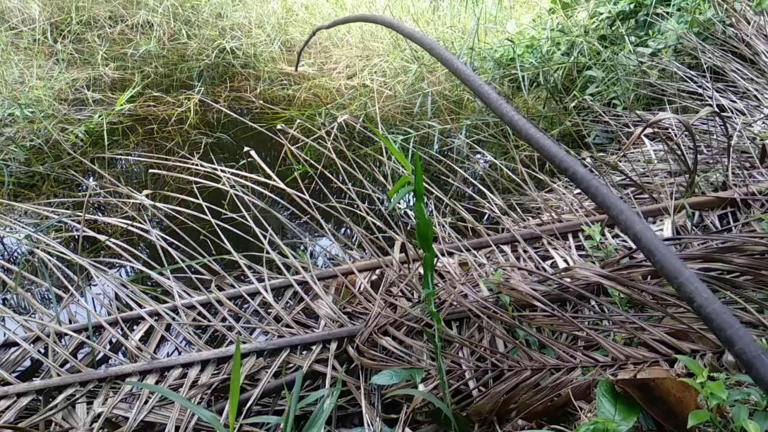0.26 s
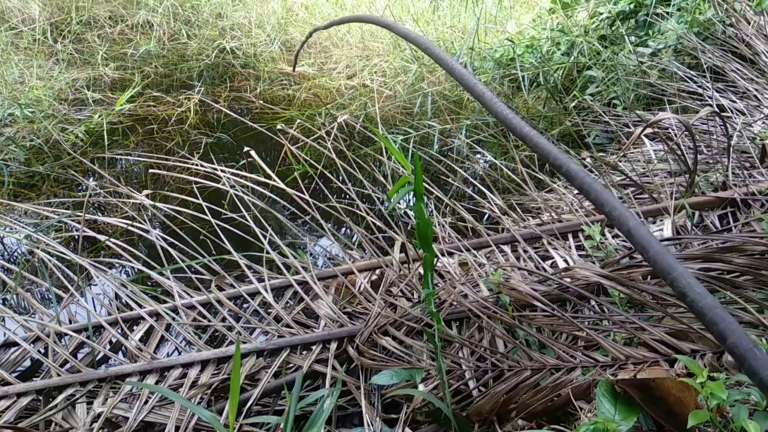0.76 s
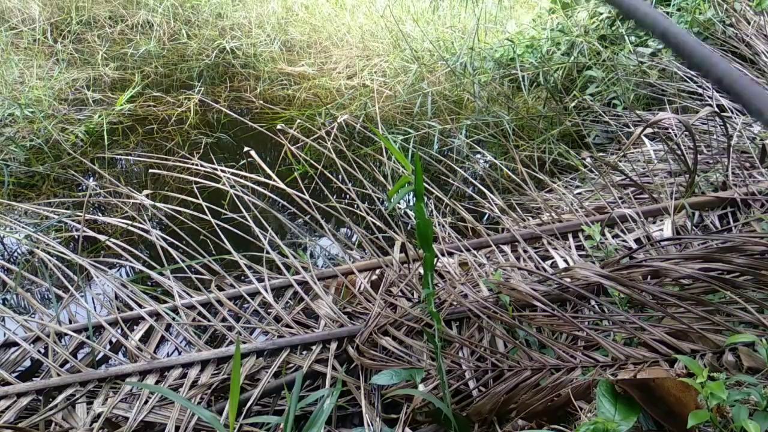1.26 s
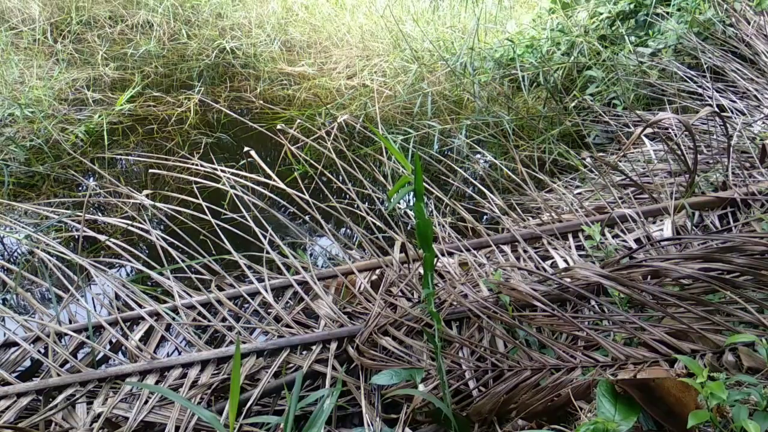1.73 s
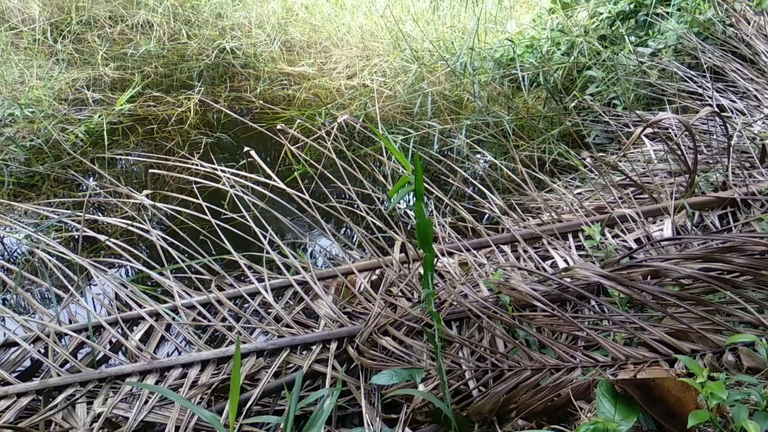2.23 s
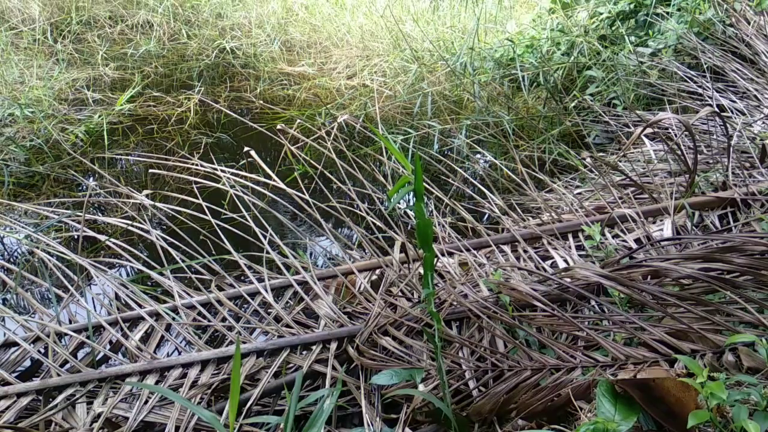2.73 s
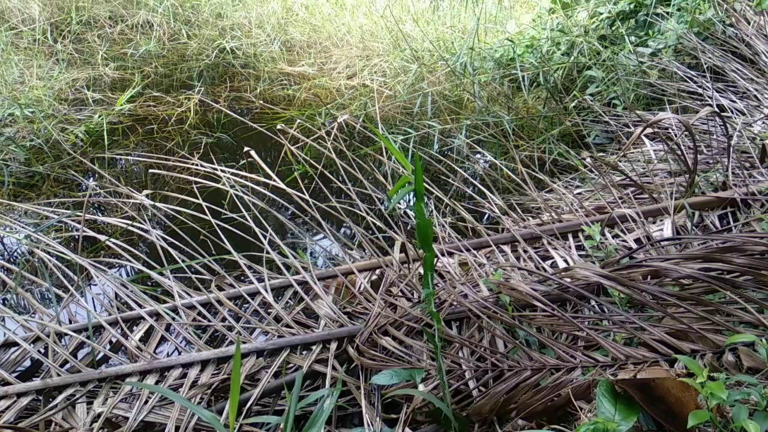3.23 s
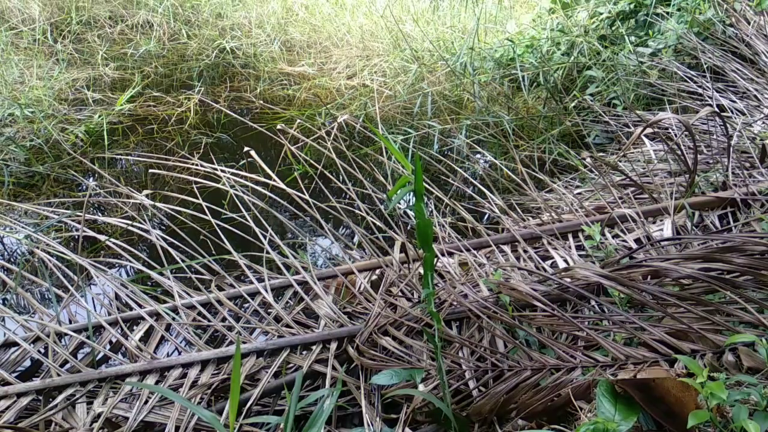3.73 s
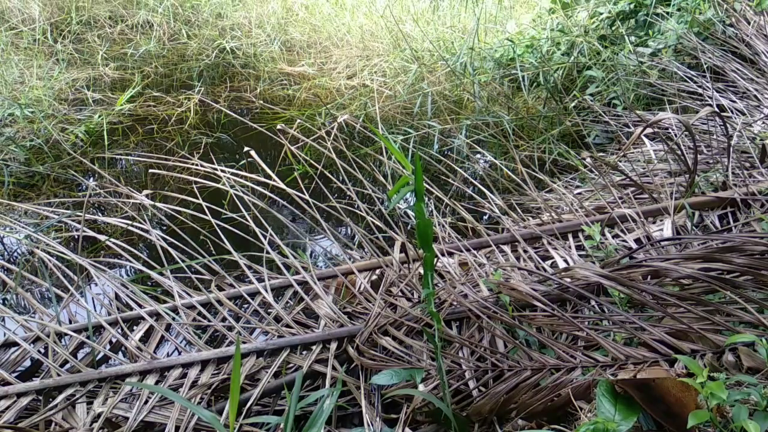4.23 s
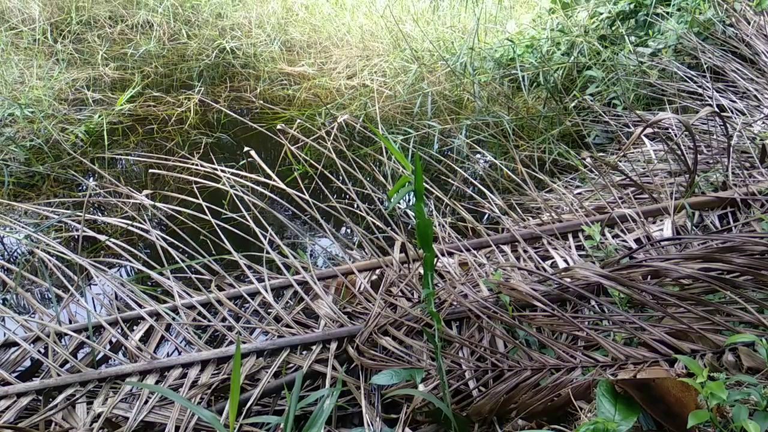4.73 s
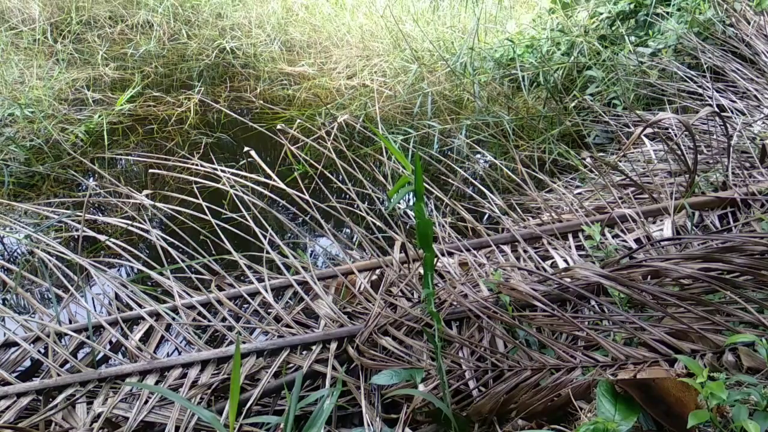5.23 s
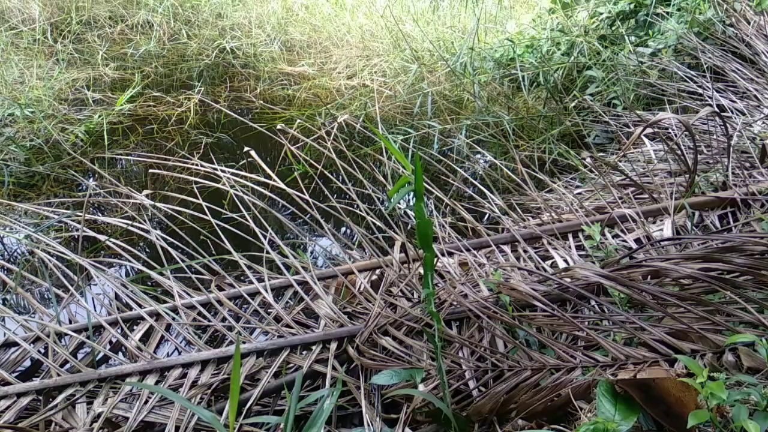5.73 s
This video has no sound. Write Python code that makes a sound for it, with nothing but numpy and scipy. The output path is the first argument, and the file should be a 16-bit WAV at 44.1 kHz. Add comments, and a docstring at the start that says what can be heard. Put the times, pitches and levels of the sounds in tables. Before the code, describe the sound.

Beside a reedy pond, a close cricket trills very high in rapid bouts with tiny gaps, over other steady crickets, rasping katydids and a shrill insect chorus. A small engine with tyre rush passes behind at first, drops slightly in pitch and fades after about three seconds, leaving a faint deep hum. Sparse bird chips come from the bushes. Stereo outdoor pickup.

```python
"""Crickets by a swampy pond

A close cricket pulses, a neighbour keeps time with it, a rival runs faster and katydids rasp over a chorus.
Insect wings are pure or noisy tones, shaped stroke by stroke or click by click; a noise band is the chorus.
A small engine (gliding tones) and its road noise (coloured noise) pass and fade, over faint bird chips,
whistles and dry fronds. Two microphone ports hear it, with reeds and foliage blurring some of the sounds."""
import sys
import numpy as np
from scipy import signal
from scipy.fft import rfft, irfft, next_fast_len
from scipy.io import wavfile
from scipy.ndimage import uniform_filter1d

SR = 44100
rng = np.random.default_rng(int(sys.argv[2]) if len(sys.argv) > 2 else 0)


def output_pcm(signal):
    """Save a mono or channel-first signal as 16-bit PCM at the path in sys.argv[1].

    Samples are clipped to [-1, 1] before scaling.
    """
    pcm = np.clip(np.atleast_2d(signal).T, -1, 1) * 32767
    wavfile.write(sys.argv[1], SR, np.round(pcm).astype(np.int16))


N = 263277
TIME = np.arange(N) / SR  # s
HZ = np.fft.rfftfreq(N, 1 / SR)

# the near cricket and its neighbour share this rate; the start is a share of a cycle
STROKES_PER_S, FIRST_STROKE = 16.597, .182
# one wing stroke, whose pitch sags as the wing slows: cycle_share (0-1), pitch_hz, relative level_db
NEAR_STROKE = [(0, 8130, -30), (.2, 8090, -20), (.27, 8130, -2.5), (.37, 8192, 2.4), (.45, 8203, 3.7),
               (.53, 8190, 3.3), (.6, 8150, .8), (.66, 8000, -3.5), (.7, 7900, -11), (.85, 7795, -13),
               (1, 7770, -18)]
# the near cricket sings in bouts: start_s, end_s, level_db before the stroke shape
BOUTS = [(0.0, 1.277, -34.5), (1.592, 2.535, -34.5), (2.74, 4.196, -34.5), (4.478, 6.1, -33.5)]
BOUT_EDGE_S, FALTER_DB = 0.013, -47.5  # fade at each end of a bout; level between bouts
# where the near cricket is heard: time_s, left_minus_right_db
CRICKET_SIDE = [(0, -1), (1.8, 0), (2.9, -3), (3.35, 3), (4.1, -3), (4.9, 4), (5.15, 0), (5.45, -6),
                (5.7, 0)]
UNEVEN_DB = .6  # slow unevenness of its strokes
# the neighbour's stroke, a little later and lower: cycle_share (0-1), pitch_hz, relative level_db
NEIGHBOUR_STROKE = [(0, 8022, -11), (.28, 8026, -13), (.42, 8036, -1.5), (.58, 8034, 0), (.7, 8024, -1.5),
                    (.8, 8020, -8), (1, 8020, -11)]
NEIGHBOUR_DB = -39.8
# a rival strokes a little faster, so it drifts in and out of step with the pair
RIVAL_PER_S, RIVAL_DB = 17.32, -39.3
# the rival's stroke mostly slides upwards: cycle_share (0-1), pitch_hz, relative level_db
RIVAL_STROKE = [(0, 8050, -15), (.45, 7990, -20), (.53, 7900, -9), (.61, 7955, -2.5), (.7, 8020, 0),
                (.8, 8058, 0), (.88, 8075, -5), (1, 8050, -15)]
# echoes off the reeds: left_delay_s, right_delay_s, relative level_db
REED_ECHOES = [(.013, .006, -17), (.021, .026, -16), (.037, .033, -16), (.046, .051, -18)]
# katydids: rasps_per_s, head_start_cycles, clicks_per_s, pitch_hz, width_hz, level_db before the lean to the right
KATYDIDS = [(9.15, .22, 133, 9480, 300, -50), (7.67, .47, 119, 9330, 380, -51),
            (9.28, 0, 90, 9590, 140, -50.8)]
# narrow singing tones: far crickets, and a side tone near 8300 Hz from the close cricket's pulsing:
# pitch_hz, width_hz, level_db, swell_db, left_lead_rad
SINGING_TONES = [(8028, 30, -45.5, .8, 2.8), (7862, 20, -48.5, 1.5, -2), (7558, 40, -55.5, 2, -1),
                 (8298, 22, -50.5, .8, 1.2), (9650, 24, -52.5, 1.5, 1)]
# colour of the massed far insects: pitch_hz, level_db_per_hz
CHORUS_COLOUR = [(7200, -102), (7430, -94), (7650, -75.5), (7780, -74), (7930, -70.5), (8120, -67.5),
                 (8370, -72), (8470, -76.8), (9000, -75), (9350, -75), (9620, -73), (9900, -76.5),
                 (10250, -82), (10500, -88), (10800, -94), (11400, -106)]

# the engine's firing rate falls as it goes by: mean, swing to either side, moment and length of the turn
FIRING_HZ, DOPPLER_HZ, ABREAST_S, TURN_S = 90.1, 2.15, 1.3, 0.868
# firing tone, then octave, before their swells: level_db, fades_from_s, fade_db_per_s
ENGINE_TONES = [(-37.5, 2.15, 2.5), (-38, 4.35, 21.5)]
# the tones swell and dip on the way: centre_s, half_length_s, firing_tone_db, octave_db
ENGINE_SWELLS = [(.27, 0.12, 4, 0), (0.535, 0.24, -2.5, 8.5), (.72, 0.1, -6, -0.5), (1.073, 0.29, 8, 5.5),
                 (1.49, 0.059, -7, -2), (2.095, 0.079, 7.5, 1), (2.85, 0.75, 2.5, 6), (4.06, 0.2, -2.5, -5),
                 (5.3, 0.27, -1, 5.5)]
# gusts scatter the engine's tones on their way over
SCATTER_RAD, SCATTER_PER_S = .27, 14
# a deeper hum that draws nearer: time_s, pitch_hz, level_db
DRONE = [(0, 50, -81), (2.6, 52.1, -60), (3.5, 51.2, -57), (4.2, 58.1, -52), (5, 59.65, -51),
         (5.97, 58.6, -51.5)]

# exhaust rumble, tyre roar, tyre rush and hiss, on top of the road colour:
# pitch_hz, top_db, growth_db_per_s, fades_from_s, fade_db_per_s
ROAD_PARTS = [(310, -1.5, 0.19, 2.94, 6.5), (705, -2.5, 2, 2.61, 4.5), (2200, -0.03, 0, 2.86, 4.5),
              (4630, 1.53, 2.5, 1.94, 4)]
# road noise before it swells, with a dip from the soft ground near 450 Hz: pitch_hz, level_db_per_hz
ROAD_COLOUR = [(20, -81), (42, -94), (75, -57), (140, -54.5), (240, -56), (330, -65), (440, -78.5),
               (620, -71.5), (850, -64.5), (1130, -67), (1500, -69), (2100, -75.5), (2500, -79),
               (3500, -83.5), (6000, -86.5)]
# air and leaves above that, swelling with the road noise: pitch_hz, level_db_per_hz
HISS_COLOUR = [(7100, -93.5), (11500, -92.5), (14000, -100), (15500, -104)]
# the road noise comes over in surges: centre_s, half_length_s, centre_hz, half_width_octaves, lift_db
SURGES = [(.3, 0.12, 2530, 0.25, 2), (0.563, 0.13, 1350, 0.47, 4.5), (0.802, 0.21, 800, 1, 6),
          (1.192, 0.27, 790, 1, 5.5), (1.12, 0.29, 258, 0.55, -3), (1.3, .95, 404, 0.29, 4),
          (2.04, .3, 1040, 0.26, 11), (2.05, .2, 1580, 0.22, 8), (2.28, 0.35, 2070, 0.11, 6),
          (2.254, 0.27, 297, 0.7, 5), (2.2, 0.43, 730, .35, 1.5), (2.425, 0.21, 4500, 0.75, 5),
          (2.55, 0.28, 1370, 0.31, 3.5), (2.7, .4, 830, .3, 2), (4.55, .4, 2700, 0.39, 2),
          (2.896, 0.18, 1070, 0.52, 8), (2.953, 0.22, 169, 0.45, 1.5), (3.386, 0.16, 800, 0.52, 3),
          (3.438, 0.17, 275, 0.89, 7), (4.142, 0.29, 2370, 1, 3), (4.2, .3, 1200, 0.16, 0),
          (4.7, 0.43, 275, 0.36, 1), (4.995, 0.92, 1670, 0.33, 1), (5.953, 0.27, 595, 0.33, 18)]
# the ground reflection shifts the colour of the tyre roar as the path changes: time_s, frequency_factor
GROUND_SHIFT = [(0, 1.04), (.5, 1.05), (.8, 0.92), (1.4, 0.85), (1.9, 0.92), (2.5, 1.03), (2.9, 0.92),
                (3.5, 0.9), (6, 0.98)]
# likeness of the road noise at the two ports, before surges change it: pitch_hz, likeness (0-1)
LIKENESS = [(60, 0.81), (300, 0.98), (470, 0.87), (850, 0), (1150, 0.6), (1500, 0.59), (3000, 0.09),
            (12000, 0.58)]
# the traffic swings to the right: lead of the right port at first and at last, and the time the swing takes
FIRST_LEAD_MS, LAST_LEAD_MS, SWING_S = 0.15, 0.4645, 1.06
# the still outdoor air under everything: pitch_hz, level_db_per_hz
STILL_AIR = [(20, -92), (40, -109), (70, -69), (115, -60), (160, -66), (230, -75.5), (320, -85), (450, -80),
             (620, -77.5), (900, -88.5), (1500, -93.5), (2800, -93), (6000, -106.5), (12000, -103),
             (15500, -108)]

# buzzy chips of far birds, and one longer faint buzz: start_s, length_s, pitch_hz, width_hz, level_db
CHIPS = [(.277, 0.05, 5750, 850, -49.5), (1.025, 0.065, 5950, 786, -53.5), (1.25, 0.08, 5700, 600, -50.5),
         (3.14, 0.09, 6170, 520, -51), (3.85, .95, 4900, 1150, -60), (5.425, 0.13, 5750, 800, -59)]
CHIP_BUZZ_HZ, CHIP_BUZZ_DB = 65, 4
# thin whistles: start_s, length_s, first_hz, middle_hz, last_hz, level_db
WHISTLES = [(.18, .28, 13500, 13950, 13650, -64), (5.88, .17, 4900, 5160, 5420, -59.5)]
# dry fronds tick: start_s, level_db at the right port
TICKS = [(.85, -55), (1.745, -51), (5.09, -57)]

EDGE_HZ = 15250  # upper limit of the whole sound


def near_cricket(left_lead_rad=1.69, level_db=1.92, grain_db=-1.1):
    """A scraper runs along the wing file once a stroke and rings the wing at the rate of the teeth."""
    hz, stroke_db = follow(NEAR_STROKE, stroke_cycle())
    side_db = follow(CRICKET_SIDE)[0]
    turns = np.cumsum(hz + 14 * drift(120) + 10 * drift(12)) / SR
    # no two strokes are pressed equally hard
    flutter_db = grain_db * drift(60) + UNEVEN_DB * drift(3.1)
    loudness = np.sqrt(2) * gain_of(level_db + effort() + stroke_db + flutter_db)
    wing = loudness * np.exp(2j * np.pi * turns)
    ports = np.array([wing * np.exp(1j * left_lead_rad), wing]) + reed_echoes(wing)
    return ports.real * gain_of([side_db / 2, -side_db / 2])


def effort():
    """Level in dB of the near cricket: full within a bout, weak between."""
    level_db = np.full(N, float(FALTER_DB))
    for start, end, db in BOUTS:
        inside = np.minimum(TIME - start, end - TIME) / BOUT_EDGE_S + 1 / 2
        level_db += (db - FALTER_DB) * np.clip(inside, 0, 1)
    return level_db


def stroke_cycle():
    """How far a cricket is through its wing stroke, 0-1, with a little unsteadiness."""
    return (STROKES_PER_S * TIME + FIRST_STROKE + 1 / 2 + .02 * drift(6)) % 1


def neighbour(left_lead_rad=2.77, lead_sway_rad=0.7):
    """A second cricket strokes its wing at the rate of the first and carries on through its pauses."""
    hz, stroke_db = follow(NEIGHBOUR_STROKE, stroke_cycle())
    turns = np.cumsum(hz + 9 * drift(60)) / SR
    # swaying reeds keep changing its path to the two ports
    lead = left_lead_rad + lead_sway_rad * drift(5.6)
    port_angles = 2 * np.pi * turns + np.outer([1, 0], lead)
    wing = gain_of(stroke_db + 1.3 * drift(8)) * np.cos(port_angles)
    return gain_of(NEIGHBOUR_DB) * evened(wing)


def rival(left_lead_rad=1.72):
    """A third cricket's wing rings without a pause, now with the pair, now between their strokes."""
    cycle = (RIVAL_PER_S * TIME + .02 * drift(6)) % 1
    hz, stroke_db = follow(RIVAL_STROKE, cycle)
    turns = np.cumsum(hz + 12 * drift(60)) / SR
    wing = gain_of(stroke_db + 1.2 * drift(8)) * np.exp(2j * np.pi * turns)
    ports = np.array([wing * np.exp(1j * left_lead_rad), wing]) + reed_echoes(wing)
    return gain_of(RIVAL_DB) * evened(ports.real)


def reed_echoes(wing):
    """Faint late copies at each port; the swaying reeds keep shifting their phase."""
    echoes = np.zeros((2, N), complex)
    for *delays, db in REED_ECHOES:
        # the delay wraps round, so the end of the sound echoes at its start
        copies = [np.roll(wing, int(s * SR)) * np.exp(2j * drift(4)) for s in delays]
        echoes += gain_of(db) * np.array(copies)
    return echoes


def katydids(ring_s=.0021, gap_db=-11, swell_db=1.0, right_db=4):
    """Each rasp is a quick run of clicks; every click rings the wing for a few milliseconds."""
    out = np.zeros((2, N))
    for rate, head_start, click_rate, hz, width, db in KATYDIDS:
        rasp_db = gap_db * np.sin(np.pi * (rate * TIME + head_start + .05 * drift(2))) ** 4
        clicks = np.cumsum(click_rate * (1 + .03 * drift(6))) / SR
        since_click_s = clicks % 1 / click_rate
        loudness = gain_of(rasp_db + swell_db * drift(0.56))
        wing = np.exp(-since_click_s / ring_s) * loudness * rng.standard_normal(N)
        # the wing resonates only near its own pitch
        wing = irfft(rfft(wing) * np.exp(-((HZ - hz) / width) ** 2 / 2), N)
        out += gain_of(db) * evened(foliage(wing, t60=.09, wet_db=-3))
    return out * gain_of([[-right_db / 2], [right_db / 2]])


def singing_tones(likeness=.6, steadiness=.7):
    """Far crickets and a side tone of the close one's pulsing: narrow noise lines that swell and ebb."""
    out = np.zeros((2, N))
    for hz, width, db, swell_db, left_lead in SINGING_TONES:
        line = 1 / (1 + ((HZ - hz) / width) ** 2) ** 1.5
        left, other = signal.hilbert([noise(line), noise(line)], next_fast_len(N))[:, :N]
        right = likeness * left + np.sqrt(1 - likeness ** 2) * other
        tone = np.array([left * np.exp(1j * left_lead), right])
        # a singing tone holds its level better than noise does
        tone /= (abs(tone) + .1) ** steadiness
        out += gain_of(db + swell_db * drift(3.5)) * evened(tone.real)
    return out


def chorus(rasp_db=.6, rasp_rate_hz=125, swell_db=0.4, right_db=5.5):
    """Countless far insects merge into a shrill, rasping noise band; the highest voices sit to the right."""
    in_band = (HZ > CHORUS_COLOUR[0][0]) * (HZ < CHORUS_COLOUR[-1][0])
    colour = gain_of(read(CHORUS_COLOUR, HZ)) * in_band
    lean_db = right_db * np.clip((HZ - 8700) / 900, 0, 1)
    white = rfft(rng.standard_normal((2, N))) * np.sqrt(SR / 2)
    band = irfft(white * colour * gain_of([-lean_db / 2, lean_db / 2]), N)
    rasp = noise(np.exp(-(2 * (HZ - rasp_rate_hz) / rasp_rate_hz) ** 2))
    return band * gain_of(rasp_db * rasp + swell_db * drift(26))


def engine(waver_db=1.5, waver_hz=0.29, drone_rough_rad=0.37):
    """The firing tone and its octave drop in pitch as they pass, wavering in the air, over a deeper hum."""
    hz = FIRING_HZ - DOPPLER_HZ * np.tanh((TIME - ABREAST_S) / TURN_S)
    angle = 2 * np.pi * np.cumsum(hz + waver_hz * drift(4.26)) / SR
    swells_db = sum(np.outer(lifts, hump(TIME, s, half)) for s, half, *lifts in ENGINE_SWELLS)
    hum = np.zeros(N)
    for k, (db, fades_from, fade) in enumerate(ENGINE_TONES):
        level_db = going_by(TIME, db, 0, fades_from, fade) + swells_db[k] + waver_db * drift(27.0)
        scatter = 2 * np.pi * rng.random() + SCATTER_RAD * drift(SCATTER_PER_S)
        hum += gain_of(level_db) * np.sin((k + 1) * angle + scatter)
    drone_hz, drone_db = follow(DRONE)
    drone_angle = 2 * np.pi * np.cumsum(drone_hz) / SR
    # the octave of the deeper hum is rough
    drone = np.sin(drone_angle) + np.sin(2 * drone_angle + drone_rough_rad * drift(28))
    return np.sqrt(2) * (hum + gain_of(drone_db) * drone)


def road(patchy_db=2.1, right_db=3, directness=1.2):
    """Exhaust rumble and tyre noise, as shaped noise, swell, move to the right and sink into the still air."""
    size, hop = 2048, 512  # samples in one short slice of sound, and from slice to slice
    hz, t = np.fft.rfftfreq(size, 1 / SR), np.arange(N // hop + 2) * hop / SR
    white = rng.standard_normal((2, (len(t) - 1) * hop))
    slices = signal.stft(white, nperseg=size, noverlap=size - hop)[2]
    left, other = slices.transpose(0, 2, 1)
    # the colour shift is strongest near 1 kHz
    shift = follow(GROUND_SHIFT, t)[0][:, None] ** np.exp(-np.log((hz + 1) / 1000) ** 2)
    surges_db = np.zeros((len(t), len(hz)))
    for s, half, centre, octaves, db in SURGES:
        surges_db += db * np.outer(hump(t, s, half), hump(np.log2(hz + 1), np.log2(centre), octaves))
    passing_db = read(ROAD_COLOUR + HISS_COLOUR, hz / shift) + road_swell(t, hz) + surges_db
    # the highest hiss is stronger at the right port
    lean_db = right_db * np.clip(hz / 12000, 0, 1)
    passing = gain_of([passing_db - lean_db / 2, passing_db + lean_db / 2])
    # random patches in time and pitch keep the level restless
    patches = uniform_filter1d(rng.standard_normal(left.shape), size=10, axis=0)
    patches = evened(uniform_filter1d(patches, size=8, axis=1))
    # a surge comes straight from the road, so both ports hear it more alike
    same = np.clip(1 - (1 - read(LIKENESS, hz)) * gain_of(-directness * surges_db), 0, 1)
    lead_ms = LAST_LEAD_MS + (FIRST_LEAD_MS - LAST_LEAD_MS) * hump(t, 0, SWING_S)
    lead = np.exp(2j * np.pi * np.outer(lead_ms, hz) / 1000)
    ports = np.array([left, lead * (same * left + np.sqrt(1 - same ** 2) * other)])
    # the still air adds its power to the passing noise
    ports *= np.hypot(passing, gain_of(read(STILL_AIR, hz))) * gain_of(patchy_db * patches)
    sound = signal.istft(ports.transpose(0, 2, 1), nperseg=size, noverlap=size - hop)[1]
    return np.sqrt(SR / 2) * sound[:, :N]


def road_swell(t, hz, dulling=0.35):
    """Level in dB of the passing noise by time and pitch: each part grows and goes by."""
    centres = [part[0] for part in ROAD_PARTS]
    shares = np.array([read(list(zip(centres, one)), hz) for one in np.eye(len(centres))])
    # the top of the rumble fades faster than its bass
    shares[0] *= 1 + dulling * np.clip((hz - 160) / 130, -.3, 1)
    parts_db = np.transpose([going_by(t, *part[1:]) for part in ROAD_PARTS])
    return parts_db @ shares


def birds():
    """Chips of buzzing noise from far back in the bushes, and thin gliding tones from the open."""
    chips, whistles = np.zeros((2, N))
    for s, length, hz, width, db in CHIPS:
        window = signal.windows.tukey(int(length * SR), .7)
        buzz = gain_of(CHIP_BUZZ_DB * np.sin(2 * np.pi * CHIP_BUZZ_HZ * TIME + drift(27)))
        rasp = evened(buzz * noise(np.exp(-2 * ((HZ - hz) / width) ** 2)))[:len(window)]
        add(chips, s, gain_of(db) * window * rasp)
    for s, length, *pitches, db in WHISTLES:
        along = np.linspace(0, 1, int(length * SR))
        glide_hz = np.interp(along, np.linspace(0, 1, len(pitches)), pitches)
        hz = glide_hz * (1 + .009 * drift(160)[:len(along)])
        tone = np.sqrt(2) * np.sin(2 * np.pi * np.cumsum(hz) / SR)
        add(whistles, s, gain_of(db) * signal.windows.tukey(len(along), .6) * tone)
    return foliage(chips, t60=.33, wet_db=2) + foliage(whistles, t60=.21, wet_db=-3)


def fronds(hz=12800, width_hz=2400, decay_s=0.015, left_db=-6, rustle_db=-62, flicker_db=3):
    """Dry palm fronds make a faint rustle of bright noise and tiny dying ticks, to the right."""
    t = np.arange(SR // 20) / SR
    # the rustle grows and fades along with the road's hiss
    hiss_db = going_by(TIME, *ROAD_PARTS[-1][1:])
    envelope = gain_of(rustle_db + hiss_db + flicker_db * drift(20))
    for s, db in TICKS:
        add(envelope, s, gain_of(db) * np.exp(-t / decay_s))
    colour = np.exp(-((HZ - hz) / width_hz) ** 2)
    return envelope * np.array([gain_of(left_db) * noise(colour), noise(colour)])


def foliage(x, t60, wet_db):
    """Each port hears the direct sound and its own scatter from stems and leaves, dying 60 dB in t60 s."""
    t = np.arange(SR // 2) / SR
    hits = rng.random((2, len(t))) < 1 / 10
    taps = rng.standard_normal((2, len(t))) * hits * gain_of(-60 * t / t60)
    taps *= gain_of(wet_db) / np.linalg.norm(taps, axis=1, keepdims=True)
    taps[:, 0] += 1  # the direct sound
    return signal.fftconvolve(x[None], taps, axes=1)[:, :N] / np.hypot(1, gain_of(wet_db))


def going_by(t, top_db, growth, fades_from, fade):
    """Level in dB of something that draws nearer, then leaves."""
    return top_db - growth * np.maximum(fades_from - t, 0) - fade * np.maximum(t - fades_from, 0)


def hump(at, centre, half):
    """A smooth bump of height 1."""
    return np.exp(-((at - centre) / half) ** 2)


def noise(gain):
    """Noise of rms 1 with the given spectrum."""
    return evened(irfft(rfft(rng.standard_normal(N)) * gain, N))


def drift(rate):
    """Slow random wandering of rms 1, up to about rate changes a second."""
    return noise(np.exp(-(HZ / rate) ** 2) * (HZ > 0))


def gain_of(db):
    """Decibels to amplitude."""
    return 10 ** (np.asarray(db) / 20)


def evened(x):
    """Scales to rms 1."""
    return x / np.sqrt(np.mean(x ** 2) + 1e-20)


def follow(rows, at=TIME):
    """The columns of a table after its first, joined by straight lines."""
    s, *columns = np.transpose(rows)
    return [np.interp(at, s, c) for c in columns]


def read(points, hz):
    """A spectrum, joined on a log-frequency axis."""
    f, value = np.transpose(points)
    return np.interp(np.log(hz + 1), np.log(f + 1), value)


def add(mix, s, sound):
    """Mixes a sound in at time s."""
    part = mix[max(round(s * SR), 0):][:len(sound)]
    part += sound[:len(part)]


def scene():
    """Insects in front, birds, fronds and the road behind."""
    crickets = near_cricket() + neighbour() + rival() + singing_tones()
    other_insects = katydids() + chorus()
    return crickets + other_insects + engine() + road() + birds() + fronds()


def record(dry):
    """A steep low-pass filter removes everything well above the band edge."""
    low_pass = signal.firwin(511, EDGE_HZ, window=("kaiser", 9), fs=SR)
    return signal.oaconvolve(dry, low_pass[None], "same")


dry = scene()
out = record(dry)
output_pcm(out)
```